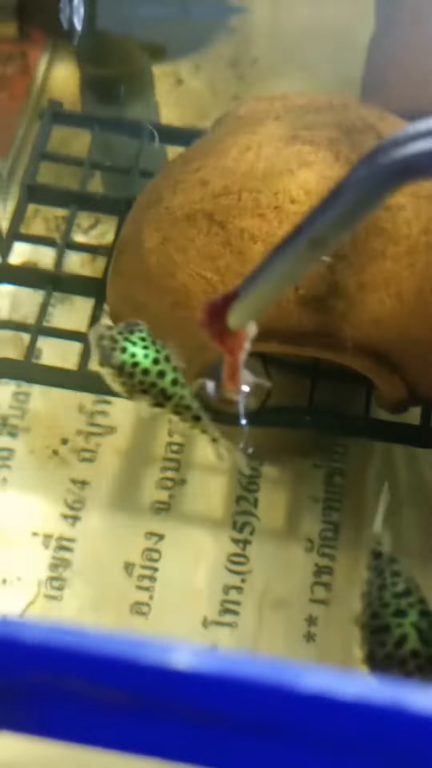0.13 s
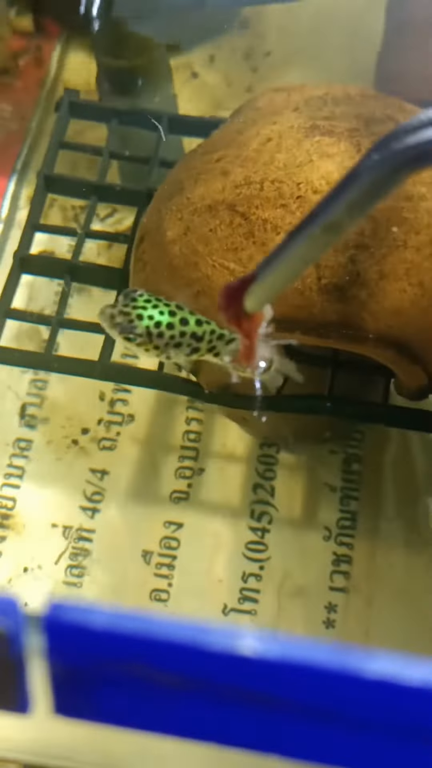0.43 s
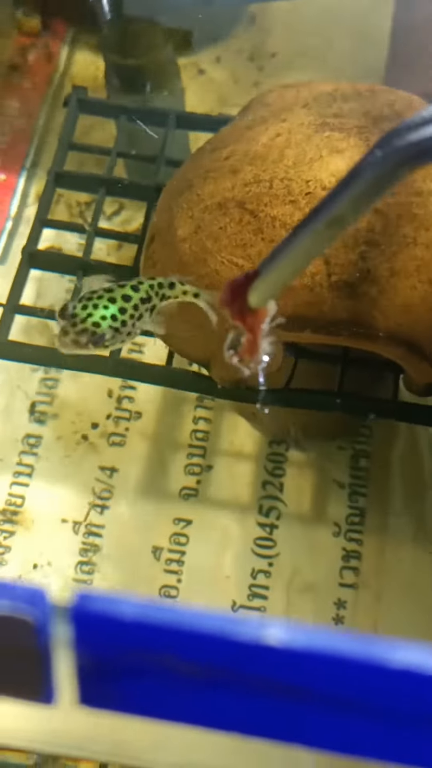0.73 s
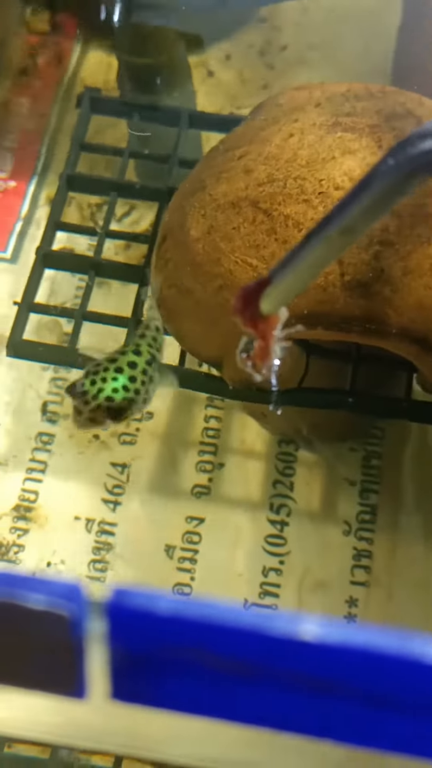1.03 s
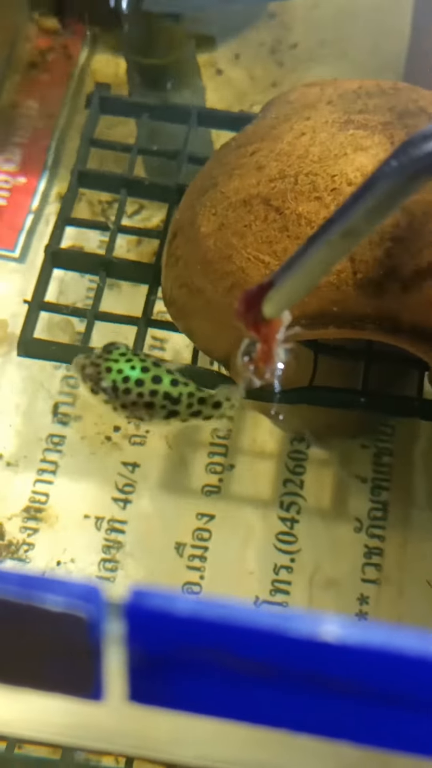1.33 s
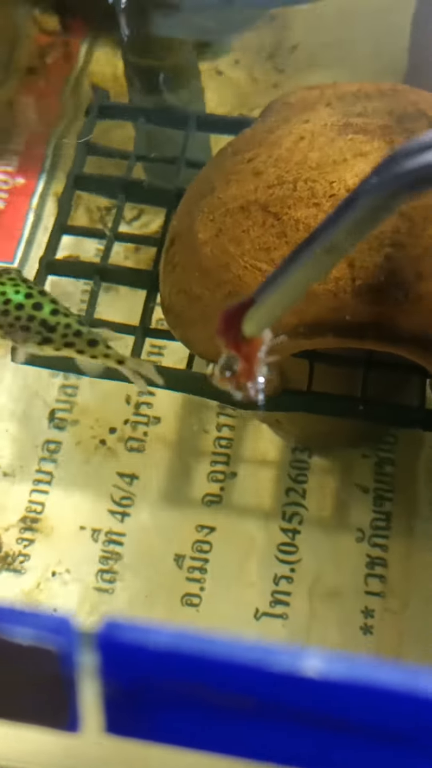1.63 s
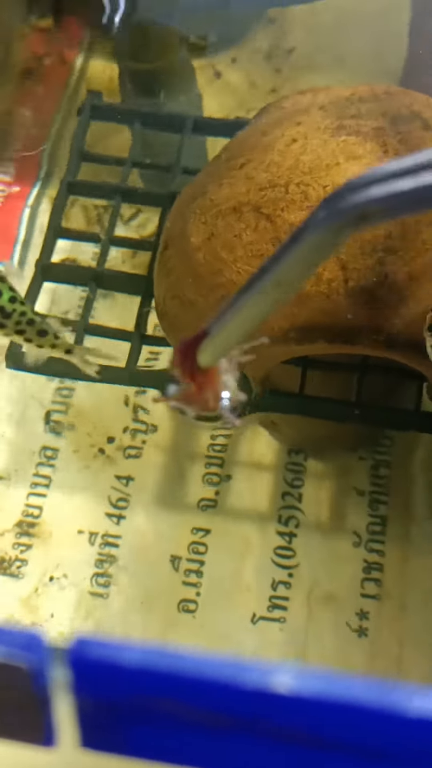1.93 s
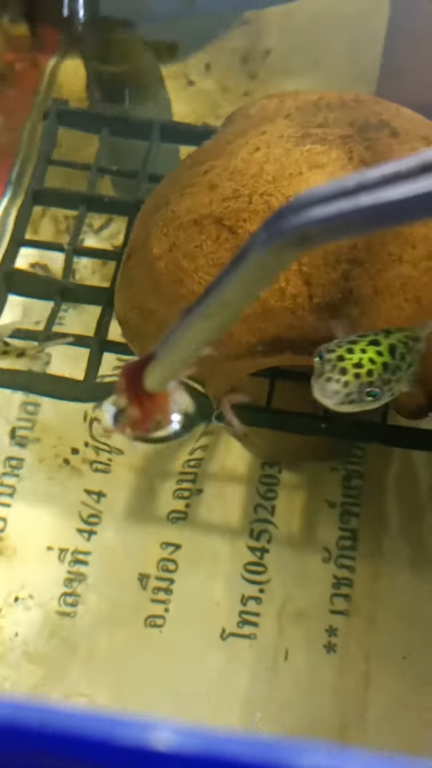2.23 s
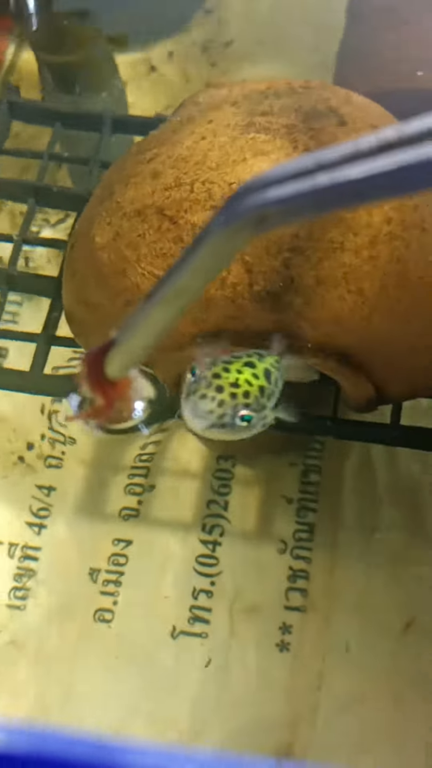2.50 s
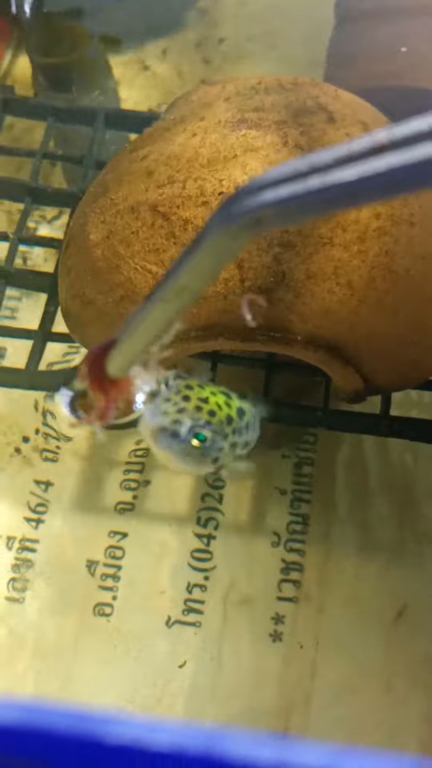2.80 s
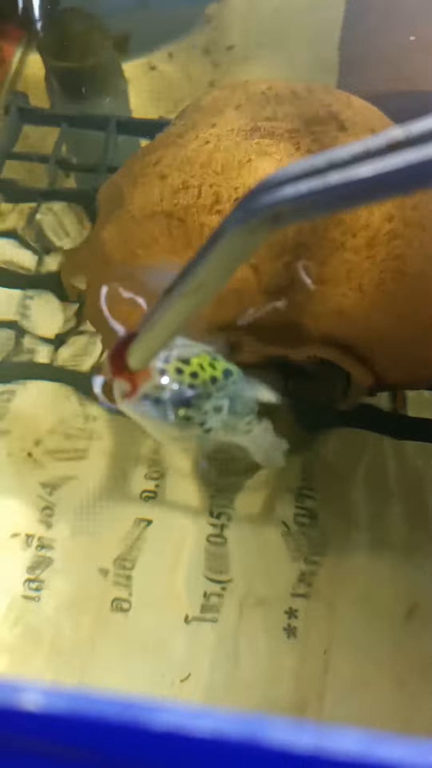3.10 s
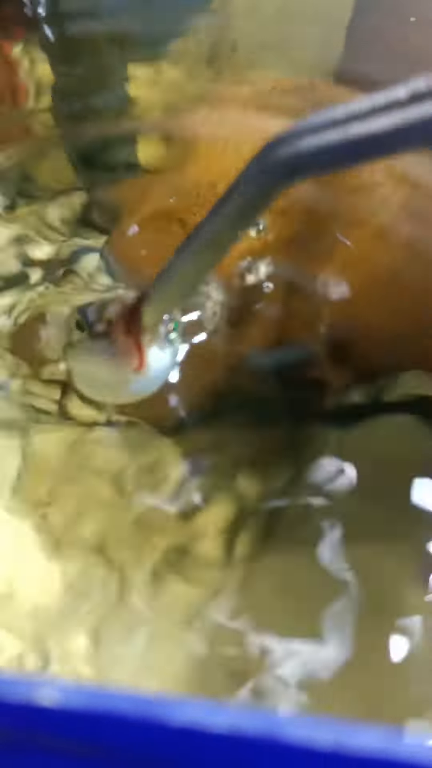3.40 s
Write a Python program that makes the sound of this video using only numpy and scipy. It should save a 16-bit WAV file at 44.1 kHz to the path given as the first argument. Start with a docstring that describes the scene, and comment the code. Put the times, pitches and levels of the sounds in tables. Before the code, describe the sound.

Steady hum and hiss of fish tank pumps, with brief wet snaps near the end.

```python
"""Small fish tank, close above

Pumps and fans hum, air hisses and a motor whines thinly over a low rumble, with a few soft ticks.
Tiny bubbles burst throughout. Near the end a fish snaps at food at the surface: sharp wet snaps,
with trapped bubbles ringing. The two microphone ports colour the treble differently."""
import sys
import numpy as np
from scipy import signal
from scipy.fft import rfft, irfft, next_fast_len
from scipy.io import wavfile

SR = 44100
rng = np.random.default_rng(int(sys.argv[2]) if len(sys.argv) > 2 else 0)


def bounce(signal):
    """Save signal as a 16-bit WAV file at the path given by the first command-line argument."""
    frames = np.transpose(np.atleast_2d(signal))
    limited = np.clip(frames, -1, 1)
    pcm = np.round(limited * 32767).astype(np.int16)
    wavfile.write(sys.argv[1], SR, pcm)


N = 156555
T = np.arange(N) / SR


# Pump and fan tones: f/Hz, level/dB, left minus right/dB
HUM_TONES = [(78.8, -59, 0), (86.4, -59.5, -7.5), (132.4, -62.5, 5), (187.3, -52.5, 4), (199.3, -53, 3.5),
             (235.5, -57, -3), (269, -55, -6), (293.7, -53.5, 0), (402, -54.5, 0.5), (447.4, -57, 6.5),
             (588, -59.5, 3), (704.6, -61.5, 6)]

def hum(wander_hz=0.834, flutter_db=2.0, swell_share=0.48):
    """Pump and fan tones waver; those in the rumble's band swell with it."""
    swell_db = swell_share * in_time(RUMBLE_GAIN)[0]
    out = 0
    for hz, db, pan_db in HUM_TONES:
        gain = from_db(db + swell_db * (140 < hz < 340) + flutter_db * drift(2.8))
        out += panned(pan_db) * gain * tone(hz + wander_hz * drift(2.86))
    return out


# Motor tone, right port: t/s, level/dB before right_trim_db
WHINE_RIGHT_LEVEL = [(0, -55), (.13, -60), (.25, -65), (.29, -56), (.41, -60), (.46, -70), (.53, -66),
                     (.57, -60), (.76, -60), (.79, -69), (.82, -57), (.87, -56), (.93, -72), (.97, -62),
                     (1.1, -61), (1.16, -78), (1.21, -57), (1.28, -56), (1.33, -66), (1.38, -59),
                     (1.48, -55.5), (1.6, -75), (1.65, -58), (1.72, -62), (1.81, -76), (1.87, -58),
                     (2.1, -56.5), (2.14, -64), (2.19, -57), (2.3, -75), (2.45, -61), (2.58, -76),
                     (2.63, -59), (2.75, -55.7), (2.85, -69), (2.91, -63), (3.05, -78), (3.13, -62),
                     (3.26, -72), (3.4, -63), (3.55, -68)]
# Its octave, both ports: t/s, level/dB
WHINE_OCTAVE_LEVEL = [(0, -66), (.14, -70), (.35, -64), (.52, -77), (.85, -65), (.92, -80), (1.08, -66),
                      (1.16, -76), (1.68, -75), (1.95, -69.5), (2.45, -68.5), (2.65, -75), (3.55, -73)]

def whine(pitch_hz=5640, wander_hz=4, jitter_hz=2.5, right_trim_db=2.3, flutter_db=1.8):
    """Thin motor tone. Standing waves fade it differently at each port and for its octave."""
    right_db = in_time(WHINE_RIGHT_LEVEL)[0] + right_trim_db
    left_db = -68 + 3 * drift(7.2)
    hz = pitch_hz + wander_hz * drift(3) + jitter_hz * drift(19)
    gain = from_db(np.array([left_db, right_db]) + flutter_db * drift(29))
    fundamental = tone(hz)
    side_tone = from_db(-17) * tone(.961 * hz + wander_hz * drift(15))
    octave = from_db(in_time(WHINE_OCTAVE_LEVEL)[0]) * tone(2 * hz)
    return gain * (fundamental + side_tone) + octave


# Surface snaps and their spray: t/s, level/dB, decay/s, centre f/Hz, left minus right/dB
FISH_SNAPS = [(3.1338, -34, .0011, 10800, 2), (3.1425, -46, .002, 9000, 0), (3.2237, -34, .0011, 9500, 2),
              (3.2319, -36.5, .0015, 8000, 2), (3.2342, -32, .0022, 8400, 2), (3.243, -52, .02, 8000, 0),
              (3.294, -46, .004, 2400, 2), (3.308, -49.5, .016, 2000, 0)]

def snaps(attack_s=.0007):
    """The fish breaks the surface in sharp, wet noise bursts."""
    return sum(panned(pan_db) * from_db(db) * band_noise(hz, q=2.3) * envelope(t, attack_s, decay_s)
               for t, db, decay_s, hz, pan_db in FISH_SNAPS)


# Trapped bubbles: t/s, f/Hz, level/dB, decay/s
BUBBLE_RINGS = [(3.1412, 2670, -44, 0.0015), (3.2325, 5350, -42, 0.003), (3.2335, 9600, -40, .0016),
                (3.235, 7150, -41, .0028), (3.2945, 2450, -41, .003), (3.3097, 1860, -43.5, 0.0063)]

def bubbles(attack_s=.0005, rise_per_s=6):
    """Trapped bubbles ring briefly and rise in pitch."""
    out = 0
    for t, hz, db, decay_s in BUBBLE_RINGS:
        rise = 1 + rise_per_s * np.clip(T - t, 0, 10 * decay_s)
        out += from_db(db) * envelope(t, attack_s, decay_s) * tone(hz * rise)
    return out


# Moving air: f/Hz, density/dB at unity gain
AIR_SPECTRUM = [(30, -72), (52, -77), (66, -72), (105, -74), (150, -67.5), (200, -68), (300, -76.5),
                (360, -72), (560, -73), (680, -78), (820, -79.5), (930, -78.5), (1170, -82), (1450, -78),
                (2100, -81), (2600, -85.5), (3200, -93), (4300, -96), (7000, -97.5), (12500, -101),
                (15500, -108)]
# Air swell: t/s, gain/dB
AIR_GAIN = [(0, 2.5), (.32, 3), (.38, 0.58), (3.05, 0.6), (3.3, 1), (3.55, 0.5)]

def air():
    """Air moved by the fans hisses."""
    return from_db(in_time(AIR_GAIN)[0]) * room_noise(AIR_SPECTRUM)


# Low rumble: f/Hz, density/dB at unity gain
RUMBLE_SPECTRUM = [(90, -105), (140, -70.5), (180, -58.5), (235, -64), (280, -62), (340, -83.5),
                   (600, -100)]
# Rumble swell: t/s, gain/dB
RUMBLE_GAIN = [(0, -3.5), (.3, 0), (.42, -2), (1.0, -2.5), (1.3, 0.5), (1.78, 2), (1.88, -3), (2.12, 2.5),
               (2.29, -4.5), (2.44, -2.5), (2.5, 1.5), (2.58, 1), (2.65, -10.5), (2.84, -2.5), (3.02, -13),
               (3.2, -2.5), (3.55, -8.5)]

def rumble():
    """Low noise swells and ebbs."""
    return from_db(in_time(RUMBLE_GAIN)[0]) * room_noise(RUMBLE_SPECTRUM)


# Opening rush: f/Hz, density/dB
RUSH_SPECTRUM = [(60, -81), (120, -62), (220, -73.5), (350, -65.5), (520, -71), (750, -87), (1500, -79.5),
                 (3000, -100)]

def rush(end_s=0.351, fade_s=.03):
    """A brief rush of noise at the start."""
    return np.clip((end_s - T) / fade_s, 0, 1) * room_noise(RUSH_SPECTRUM)


# Faint ticks: t/s, level/dB, decay/s
SOFT_TICKS = [(.286, -54, .006), (.528, -52, .015), (1.262, -47.5, .002), (1.642, -50.5, .002)]

def ticks(centre_hz=4500, attack_s=.001):
    """Soft ticks barely above the hiss."""
    return sum(from_db(db) * band_noise(centre_hz, q=3) * envelope(t, attack_s, decay_s)
               for t, db, decay_s in SOFT_TICKS)


def fizz(pops_per_s=50, spread_db=2.6, centre_hz=10500, decay_s=.0011):
    """Tiny bubbles burst at random at the surface and make the hiss prickle."""
    onsets = rng.random(N) < pops_per_s / SR
    pop_db = -60 + spread_db * np.minimum(rng.exponential(1, N), 4)
    pole = np.exp(-1 / (decay_s * SR))
    decays = signal.lfilter([1], [1, -pole], onsets * from_db(pop_db) + 1e-18)
    return decays * band_noise(centre_hz, q=1)


def room(x, t60_s=0.24):
    """Short diffuse tail from the tank walls and the room."""
    t = T[:SR // 2]
    tail = rng.standard_normal((2, len(t))) * from_db(-60 * t / t60_s)
    tail /= np.linalg.norm(tail[0])
    return signal.fftconvolve(x, tail, axes=1)[:, :N]


# Diffuse field: f/Hz, left-right correlation
FIELD_CORRELATION = [(40, .97), (190, .93), (350, .7), (700, .3), (1300, -.15), (2600, -.25), (5000, 0)]

def room_noise(spectrum):
    """Diffuse stereo noise, alike in the bass and unrelated in the high treble."""
    size = next_fast_len(N)
    hz = np.arange(size // 2 + 1) * SR / size
    alike, = at_hz(FIELD_CORRELATION, hz)
    mid, side = rfft(rng.standard_normal((2, size)))
    pair = np.sqrt((1 + alike) / 2) * mid + np.sqrt((1 - alike) / 2) * side * [[1], [-1]]
    density = from_db(at_hz(spectrum, hz)[0])
    top_hz = spectrum[-1][0]
    roll_off = 1 / (1 + (hz / (2 * top_hz)) ** 4)
    return irfft(pair * density * roll_off, size)[:, :N] * np.sqrt(SR / 2)


def band_noise(hz, q, top_hz=12000):
    """Stereo noise in one broad resonance, top rounded off; rms 1."""
    b, a = signal.iirpeak(hz, q, fs=SR)
    band = signal.lfilter(b, a, rng.standard_normal((2, N)))
    noise = signal.sosfilt(signal.butter(2, top_hz, fs=SR, output="sos"), band)
    return noise / noise.std()


def tone(hz):
    """Sine along a pitch track; rms 1."""
    return np.sqrt(2) * np.sin(2 * np.pi * (np.cumsum(hz) / SR + rng.random()))


def envelope(start_s, attack_s, decay_s):
    """Quick rise, exponential fall; peak 1."""
    age_s = np.maximum(T - start_s, 0)
    shape = (1 - np.exp(-age_s / attack_s)) * np.exp(-np.minimum(age_s / decay_s, 100))
    return shape / shape.max()


def drift(corner_hz):
    """Slow random motion; spread 1."""
    hz = np.arange(N + 1) * SR / (2 * N)
    slow = irfft(rfft(rng.standard_normal(2 * N)) / (1 + (hz / corner_hz) ** 2))
    return slow[:N] / slow.std()


def from_db(db):
    """Decibels to gain."""
    return 10 ** (np.asarray(db) / 20)


def panned(db):
    """Left and right gains for a level difference."""
    return from_db(np.array([[db], [-db]]) / 2)


def in_time(rows):
    """Curve columns at every sample."""
    t, *columns = np.transpose(rows)
    return [np.interp(T, t, c) for c in columns]


def at_hz(rows, hz):
    """Spectrum columns, interpolated in log frequency."""
    f, *columns = np.transpose(rows)
    return [np.interp(np.log(hz + 1e-9), np.log(f), c) for c in columns]


def scene(room_db=-10.5):
    """Running equipment, plus close small sounds with their room tail."""
    near = snaps() + bubbles() + ticks() + fizz()
    bed = hum() + whine() + rush() + air() + rumble()
    return bed + near + from_db(room_db) * room(near)


# Microphone port response: f/Hz, left gain/dB, right gain/dB
PORT_RESPONSE = [(30, -0.1, 0.5), (204, -2.5, -3), (730, -0.5, 0), (950, 0, 3), (1340, 0.5, 1.5),
                 (2080, -3.5, 3), (5060, -4, 3), (5730, -5, 3.5), (7100, -43, 5), (7300, -14, 3),
                 (8180, -0.5, -14), (8920, 1, -6), (9650, 9.5, -22), (10940, 0.5, -33), (11840, -0.5, -12),
                 (12700, 1, -4), (14000, -7, -3), (15500, -3, 1)]

def record(dry, low_cut_hz=26, high_cut_hz=15550):
    """Each port adds its own peaks and notches; deep bass and top are cut steeply."""
    size = 2 * next_fast_len(N)
    hz = np.arange(size // 2 + 1) * SR / size
    cepstrum = irfft(np.log(from_db(at_hz(PORT_RESPONSE, hz))))
    lag = np.arange(size)
    causal_fold = 1 + np.sign(size // 2 - lag) - (lag == 0)  # minimum phase
    colour = np.exp(rfft(cepstrum * causal_fold))
    low_pass = 1 / np.sqrt(1 + (hz / high_cut_hz) ** 300)
    high_pass = signal.butter(6, low_cut_hz, "high", fs=SR, output="sos")
    spectrum = rfft(signal.sosfilt(high_pass, dry), size)
    return irfft(spectrum * colour * low_pass)[:, :N]


dry = scene()
out = record(dry)
bounce(out)
```